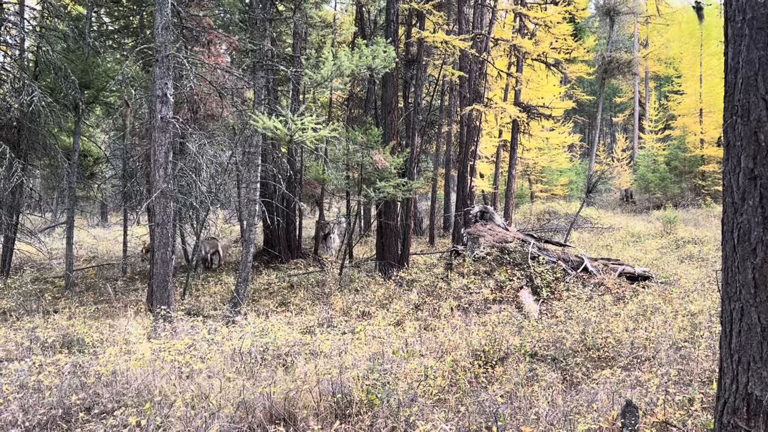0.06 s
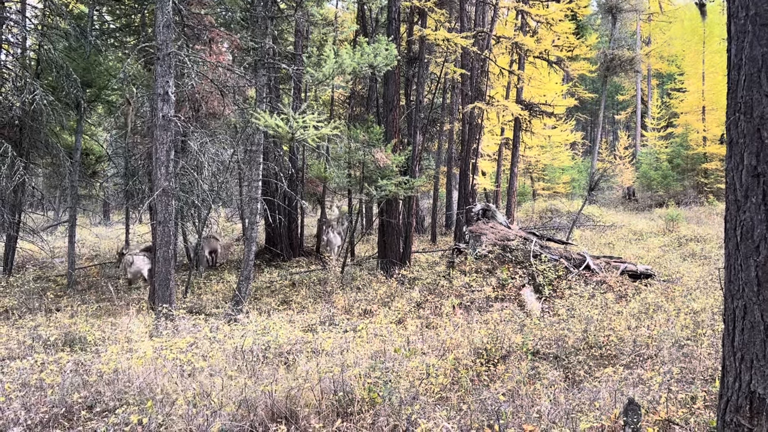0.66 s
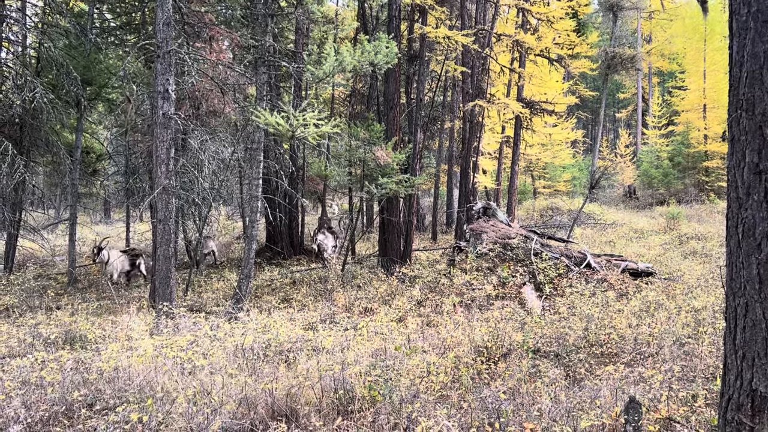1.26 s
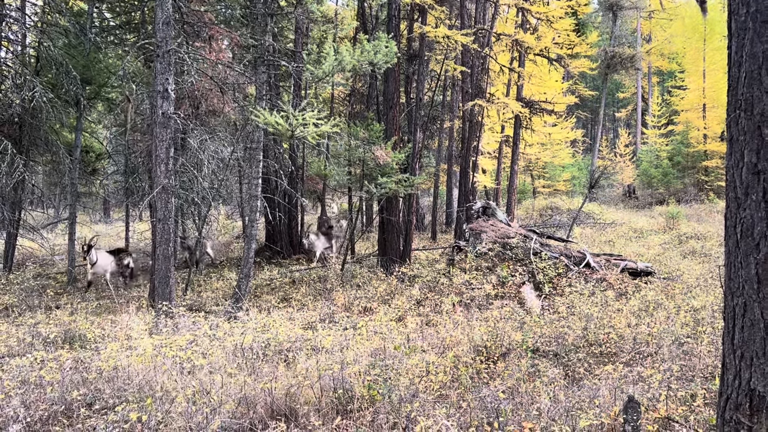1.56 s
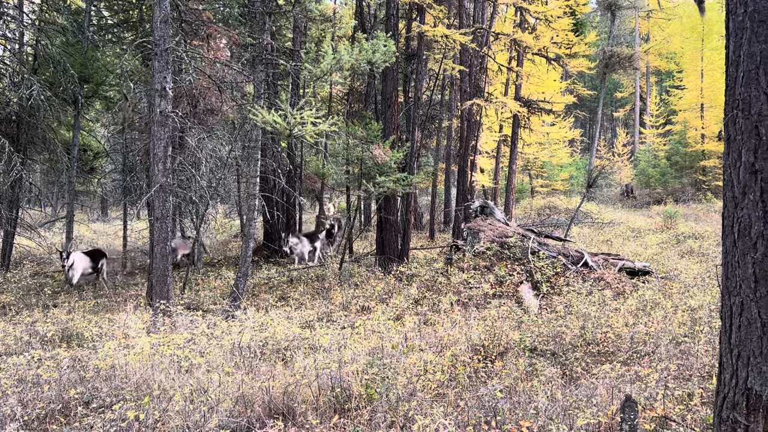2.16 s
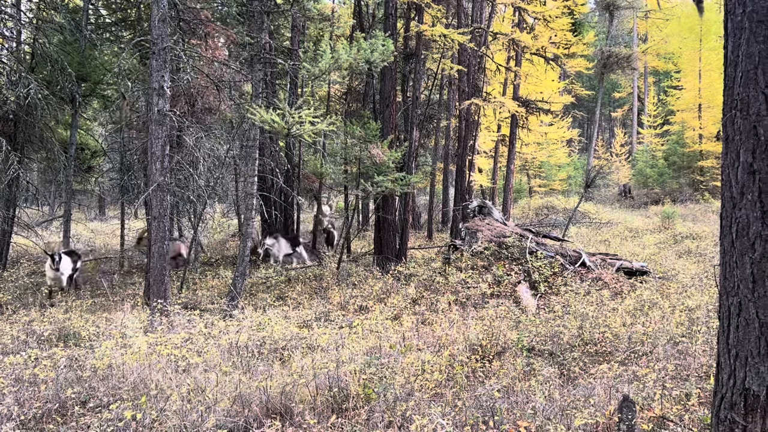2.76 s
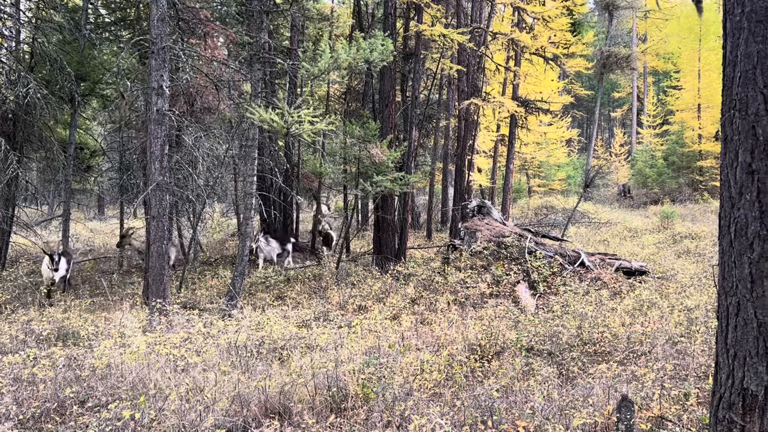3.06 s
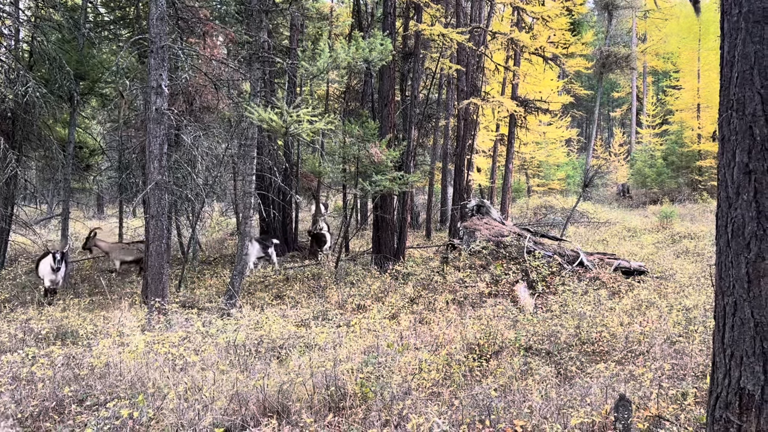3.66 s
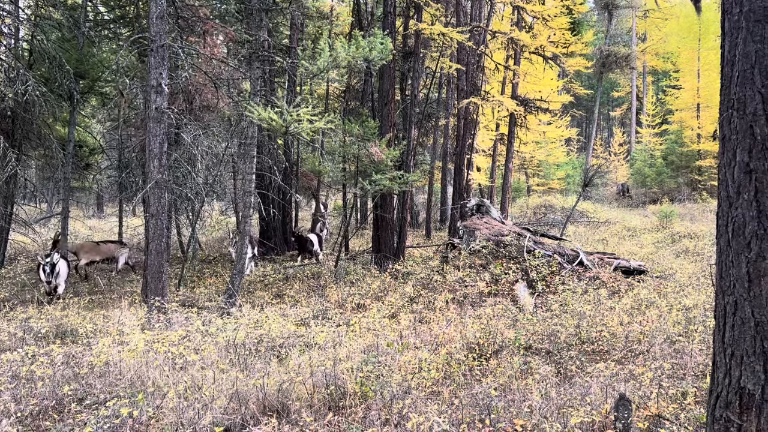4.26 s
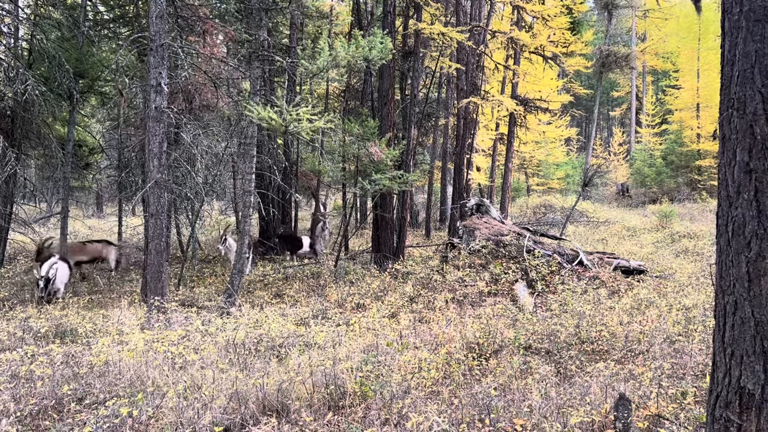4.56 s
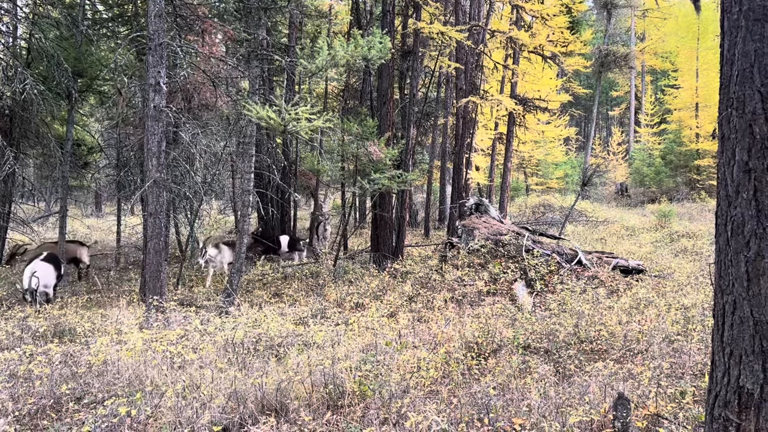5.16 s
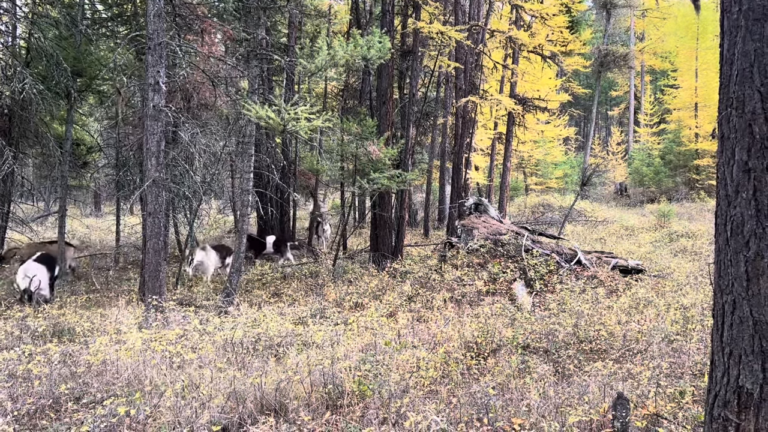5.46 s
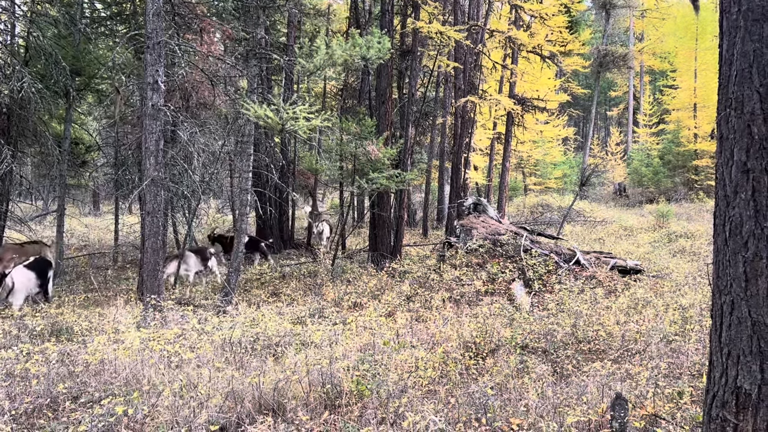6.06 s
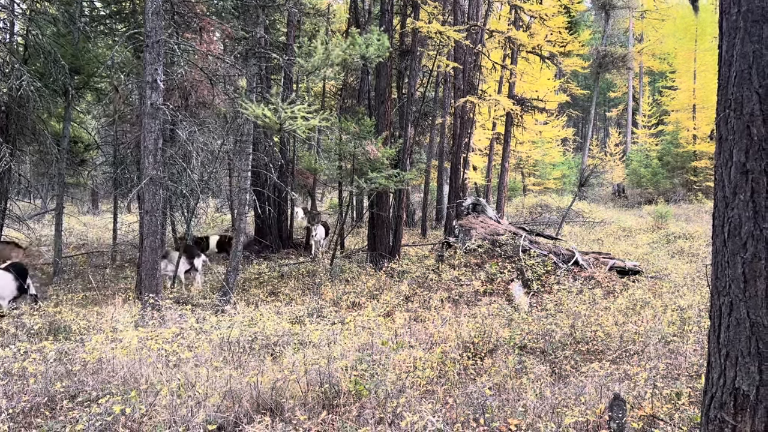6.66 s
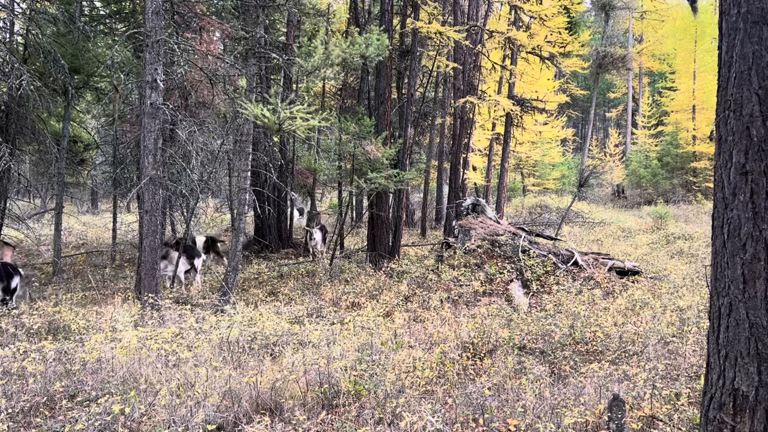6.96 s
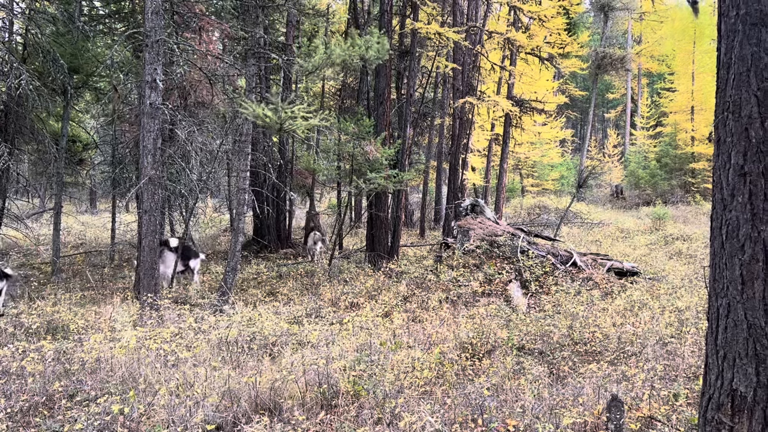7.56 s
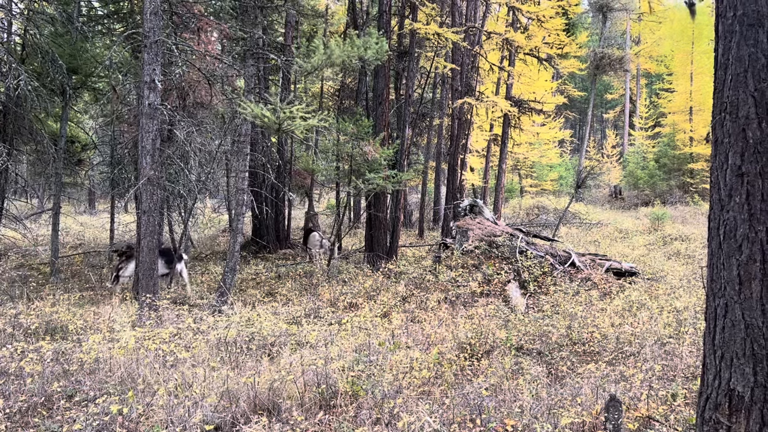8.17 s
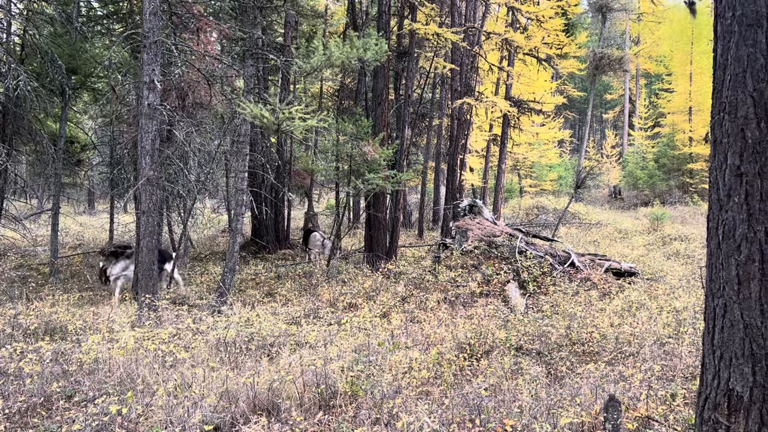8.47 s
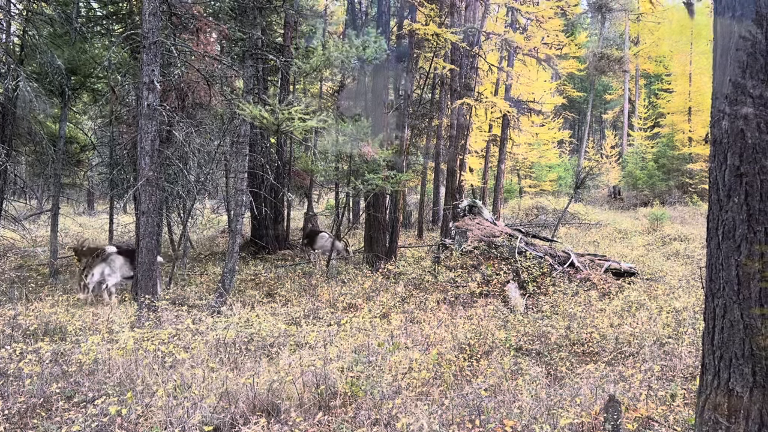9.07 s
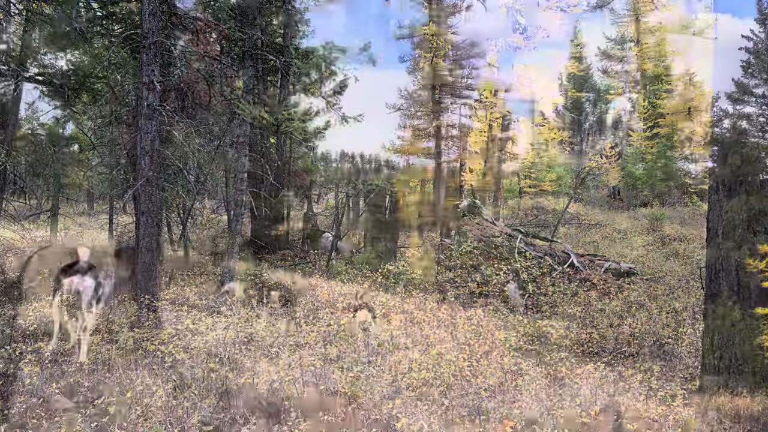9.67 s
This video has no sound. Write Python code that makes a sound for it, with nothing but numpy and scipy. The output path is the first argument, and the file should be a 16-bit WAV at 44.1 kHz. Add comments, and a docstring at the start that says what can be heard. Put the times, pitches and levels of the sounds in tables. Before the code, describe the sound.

Goats swish through dry grass and brush, snapping twigs and crunching litter, with light wind on the microphone.

```python
"""The edge of a forest clearing: goats walk through dry grass and brush, left of a hand-held camera.
Their legs swish through leaves and crackling stems, twigs snap and echo faintly among the trunks,
and hooves crunch the litter and thud on the soil. Light wind rumbles on the microphone and buffets it
in puffs, hardest near the end, when a small bird calls once far off."""
import sys
import numpy as np
from scipy import signal
from scipy.fft import rfft, irfft, next_fast_len
from scipy.io import wavfile
from scipy.ndimage import uniform_filter1d, map_coordinates

SR = 44100
rng = np.random.default_rng(int(sys.argv[2]) if len(sys.argv) > 2 else 0)


def inscribe(sig):
    """Save sig as 16-bit PCM at rate SR to the path in sys.argv[1].

    A 1-D sig is mono; a 2-D sig holds one channel per row.
    Samples are clipped to [-1, 1] before scaling.
    """
    pcm = np.round(np.clip(np.atleast_2d(sig).T, -1, 1) * 32767)
    wavfile.write(sys.argv[1], SR, pcm.astype(np.int16))


N = 432621
TOP_HZ = 15900  # top of the camera's audio band


# Tone of the leaf rustle and of the brighter stem crackle: freq_hz, level_db
LEAF_EQ = [(100, 14.5), (300, 0.5), (600, 0), (1200, -2.5), (2100, 1.5), (3200, 1.5), (4500, -5),
           (5000, -1), (5350, 3.5), (6600, 3), (8000, -2.5), (10000, -36), (16000, -53)]
STEM_EQ = [(2000, -12), (5000, -6), (7300, -7.5), (8400, 1.5), (10300, -9), (12300, -7), (13400, -4),
           (15500, -2)]
def grass():
    """Legs push through leaves and dry stems: a harder push breaks more of them, in clumps."""
    leaf_db, stem_db = brushing()
    fractures_per_s = 3000 * unit(amp(leaf_db))
    leaves = patchy(crackle(fractures_per_s, hiss_share=.52), depth_db=3)
    stems = patchy(crackle(fractures_per_s, hiss_share=.6), depth_db=2)
    leaves = coloured(leaves, LEAF_EQ) * amp(leaf_db + 1.3 * wobble(50))
    stems = coloured(stems, STEM_EQ) * amp(stem_db + 1.43 * wobble(55))
    return leaves + stems


# The bed of the whole herd shuffling: time_s, leaf_db, stem_db
HERD_SHUFFLE = [(0, -63, -57.5), (0.35, -70, -62), (0.82, -80, -68), (1.2, -62.5, -65), (1.55, -63, -56),
                (2.35, -66, -60.5), (3.25, -65.5, -62), (4.75, -65.5, -58.5), (6.1, -69, -55),
                (6.65, -66, -56), (7.8, -66.5, -59.5), (8.55, -61, -54), (9.2, -64, -62),
                (9.81, -61.5, -64.5)]
# Single legs sweeping through the grass: peak_s, leaf_db, stem_over_leaf_db, length_s
LEG_SWISHES = [(0.026, -57.5, 4, 0.033), (0.431, -63, -14, 0.074), (0.733, -61.5, -17, 0.035),
               (0.984, -60.5, -5, 0.14), (1.423, -60.5, 6, 0.21), (1.538, -56.5, -16, .07),
               (1.717, -58, 4, 0.027), (1.801, -57, 1.5, 0.09), (2.202, -63, 8.5, 0.09),
               (2.477, -64, 7, .1), (2.671, -60, -4, 0.17), (2.788, -60, -1, 0.05), (2.966, -57, 5, 0.045),
               (3.079, -63.5, 6, 0.067), (3.343, -55, 1, 0.04), (3.435, -59, 5.5, 0.092),
               (3.702, -62.5, 0.5, 0.16), (4.169, -59.5, 4.5, 0.18), (4.418, -62, 3, 0.07),
               (4.647, -63, 0, .15), (4.866, -57.5, 7, .05), (4.935, -57, 1.5, .07), (5.194, -62, 3.5, .15),
               (5.355, -62, 5, 0.07), (5.558, -59, 3, .11), (5.923, -56.5, -10, 0.12),
               (6.174, -58.5, -10, 0.041), (6.288, -54, 4, 0.065), (6.6, -59, 5, 0.11),
               (6.758, -58.5, 8, .08), (7, -59, 8, 0.046), (7.352, -58.5, -3, .09), (7.529, -59, 6.5, .14),
               (8.08, -64.5, -4, 0.18), (8.577, -54, 3, 0.06), (8.668, -61, 2, .06),
               (8.824, -70.5, 11, 0.45), (9.464, -64, -0.5, 0.38)]
def brushing(drop_db=11, rise_share=.73):
    """Leaf and stem faders in dB: each swish swells over the bed, then falls drop_db per length."""
    t = np.arange(N) / SR
    leaf_power, stem_power = amp(curves(HERD_SHUFFLE)) ** 2
    for peak_s, leaf_db, stem_over_leaf_db, length_s in LEG_SWISHES:
        near = np.abs(t - peak_s) < 4 * length_s
        lengths_away = np.maximum((peak_s - t[near]) / rise_share, t[near] - peak_s) / length_s
        power = amp(leaf_db - drop_db * lengths_away) ** 2
        leaf_power[near] += power
        stem_power[near] += power * amp(stem_over_leaf_db) ** 2
    return 10 * np.log10([leaf_power, stem_power])


def crackle(fractures_per_s, hiss_share, spread_db=2.6, ring_s=.003, size=192):
    """Tiny fractures of unequal size, each with its own pitch, over the hiss of sliding blades."""
    starts = np.flatnonzero(rng.random(N) < fractures_per_s / SR)
    t = np.arange(size) / SR
    chance, pitch, *phases = rng.random((len(starts), 4)).T[..., None]
    envelopes = amp(spread_db * np.minimum(-np.log(chance), 4)) * decay(t, ring_s)
    positions = (starts[:, None] + np.arange(size)).ravel()
    cracks = []
    for phase in phases:
        grains = envelopes * np.sin(2 * np.pi * (TOP_HZ * pitch * t + phase))
        cracks.append(np.bincount(positions, grains.ravel(), N)[:N])
    return np.sqrt(1 - hiss_share) * unit(np.array(cracks)) + np.sqrt(hiss_share) * noise(N)


def patchy(x, depth_db):
    """Each tuft has its own colour: random gain over patches of frequency and time."""
    spectrogram = signal.stft(x, nperseg=256)[2]
    patches = rng.standard_normal(spectrogram.shape[1:])
    for axis, size in [(0, 4), (0, 7), (1, 7), (1, 12)]:
        patches = uniform_filter1d(patches, size, axis)
    return signal.istft(spectrogram * amp(depth_db * unit(patches)), nperseg=256)[1][:, :N]


# Tone of breaking wood: freq_hz, level_db
WOOD_EQ = [(200, -8), (600, 0), (2000, -1), (3300, 1), (4500, -4), (7000, -7), (8500, 6.5), (11000, 1.5),
           (16000, 0)]
# Twig snaps: start_s, level_db, woody_db, brittle_db, ring_hz, pan_left_db
TWIG_SNAPS = [(0.3754, -28.5, -13, -6.5, 6370, -4), (0.9685, -34, -22.5, -52, 5100, 5),
              (1.0605, -28.5, -21, -11, 7100, -1), (1.1331, -38, -16, -26, 2790, 5),
              (1.3857, -31, -48, -21, 6753, 1), (1.4556, -33, -16, -10, 6600, 6),
              (1.628, -34.5, -30, -1, 8360, -2), (2.5446, -33, -12, -14, 4228, 2),
              (2.5849, -37.5, -11, -9, 5620, 2), (3.0864, -39, -7, -11, 5200, 3),
              (3.3057, -19.5, -20, -19, 1901, 1), (3.3362, -37, -3, -19, 2204, 5),
              (3.675, -32.5, -20.5, -27, 4400, 0.5), (4.1378, -30, -40, -18, 6326, 2),
              (4.349, -35.5, -14, -12, 3747, 8), (4.5443, -18.5, -23, 1.5, 2400, 8),
              (4.8349, -32, -5, 1, 3833, 1), (4.861, -33, -22, -13, 5523, 3),
              (4.9532, -31.5, -35, -5, 5220, -2), (5.305, -38, -13, -45, 2940, 5),
              (5.547, -36, -13, -55, 5520, 4), (6.281, -27, -13, 27, 5250, -1),
              (6.2918, -30.5, -14.5, -66, 1930, 3), (6.7423, -32.5, -8, 9, 5373, -2),
              (7.1556, -42, -25, -36, 4590, 5), (7.236, -40, -12, -51, 2824, 3),
              (7.9741, -32.5, -6, -6.5, 3234, 3.5), (8.5118, -32.5, -44, -5, 6460, 1),
              (8.5422, -30.5, -8, 3, 2615, -2), (8.881, -30, -17, -22, 2550, 2.5),
              (8.9528, -39, -7, -17, 2652, 0), (9.4524, -36, -3.5, -6, 6450, -2),
              (9.624, -37, -7, -18, 2907, 3)]
def twigs(strain_s=.004, splinter_s=.05, trim_db=-27, size=8192):
    """Fibres strain, the twig cracks and splinters, small twigs least; each rings at its own pitch."""
    track, t = np.zeros((2, N)), np.arange(size) / SR - strain_s
    strain = .03 * decay(np.abs(t), .0061)
    for start_s, level_db, woody_db, brittle_db, ring_hz, pan_left_db in TWIG_SNAPS:
        fibres = noise(size) * amp(3 * rng.standard_normal(size))
        splinter_gain = .19 * amp(.45 * min(level_db + 28, 0))
        tearing = .8 * decay(np.abs(t), .0035) + splinter_gain * decay(np.abs(t), splinter_s)
        force = fibres * np.where(t < 0, strain, tearing)
        force[:, round(strain_s * SR)] += 2.5  # the crack itself
        thickness_eq = [(2500, woody_db + 10), (6500, .004), (13000, brittle_db + 7)]
        ring_db = lambda hz: 11 * resonance(hz, ring_hz, sharpness=6)
        snap = struck(force, lambda hz: along(WOOD_EQ, hz) + along(thickness_eq, hz) + ring_db(hz))
        centred = np.array([unit(side) for side in microphone(snap)])
        panned = amp(np.array([[.5], [-.5]]) * pan_left_db) * centred
        add(track, start_s - strain_s + .001, amp(level_db + trim_db) * unit(panned))
    return track


# Needles, cones and dry twigs crushed underfoot: start_s, level_db, pitch_hz
LITTER_CRUNCHES = [(0.687, -54.5, 2400), (0.729, -55.5, 922), (0.904, -47.5, 5200), (1.2, -43, 5200),
                   (1.338, -41.5, 4230), (1.44, -40, 7440), (1.527, -44, 3660), (1.56, -49, 950),
                   (1.686, -47, 1140), (1.8, -49, 2500), (1.875, -46.5, 2530), (1.974, -47, 3280),
                   (3.31, -45, 1860), (3.335, -45, 600), (3.446, -42, 6500), (3.569, -45, 2550),
                   (3.811, -48, 1570), (4.203, -48, 2955), (5.204, -46.5, 1200), (5.346, -45.5, 1297),
                   (5.742, -47, 2307), (6.151, -52.5, 700.5), (6.164, -45, 2875), (6.293, -42, 960),
                   (6.461, -52.5, 1080), (6.633, -45, 3026), (7.159, -46, 1099), (7.429, -48, 2698),
                   (8.012, -47, 730), (8.361, -46.5, 713.7), (8.568, -38, 3304), (8.584, -42, 1300),
                   (8.656, -49, 1080), (8.814, -46, 760), (8.858, -46, 795), (8.96, -48, 744),
                   (9.222, -48, 693)]
def crunches(trim_db=-25, size=8192):
    """A hoof presses the litter: a quick cluster of small breaks in one soft resonance."""
    track, t = np.zeros((2, N)), np.arange(size) / SR
    press = (1 - np.exp(-t / .0005)) * decay(t, .038)
    for start_s, level_db, pitch_hz in LITTER_CRUNCHES:
        breaks = press * noise(size) * amp(9 * rng.standard_normal(size))
        crunch = struck(breaks, lambda hz: 30 * np.log10(resonance(hz, pitch_hz, sharpness=2.1) + .001))
        add(track, start_s, amp(level_db + trim_db) * unit(crunch))
    return track


# Single dry stalks that stand out of the rustle: start_s, level_db, pitch_hz
STALK_CRACKS = [(1.528, -35, 9100), (1.569, -40, 8300), (2.12, -36.5, 8400), (2.205, -41, 8430),
                (2.414, -45, 8960), (2.805, -41, 5030), (3.38, -37, 8190), (3.805, -42, 5400),
                (4.914, -43, 3797), (4.931, -34, 13000), (5.912, -38, 8200), (5.959, -37, 13400),
                (6.254, -40, 5300), (6.612, -40, 13480), (6.953, -37, 8576), (7.007, -37, 5400),
                (7.355, -35, 13010), (8.292, -39, 8297), (8.754, -38, 8215)]
def stalks(thin_count=170, decay_s=.013, size=2048):
    """Stalks crack as they give way; thin ones tick at random, more and louder where legs push hard."""
    track, t = np.zeros((2, N)), np.arange(size) / SR
    leaf_db = brushing()[0]
    total_push = np.cumsum(amp(leaf_db))
    moments = np.searchsorted(total_push, rng.random(thin_count) * total_push[-1])
    level_scatter, pitch_scatter = np.clip(rng.standard_normal((thin_count, 2)), -2, 2).T
    thin_db = leaf_db[moments] + 9.5 + 2.3 * level_scatter
    thin_hz = 4400 * 2 ** (.65 * pitch_scatter)
    for start_s, level_db, pitch_hz in [*STALK_CRACKS, *zip(moments / SR, thin_db, thin_hz)]:
        burst = noise(size) * decay(t, decay_s)
        tick = struck(burst, lambda hz: 20 * np.log10(resonance(hz, pitch_hz, sharpness=3) + .001))
        add(track, start_s, amp(level_db) * tick / np.abs(tick).max())
    return track


# Dull tone of the ground: freq_hz, level_db
SOIL_EQ = [(30, -12), (70, -5), (125, 1.5), (175, 1.5), (240, -1.5), (400, -8.5), (600, -6), (1000, -13.5),
           (1600, -23), (4000, -57)]
# Hoof falls: start_s, level_db, knock_db, decay_s
HOOF_THUDS = [(0.025, -46, -41, 0.12), (0.381, -47.5, -31, 0.14), (1.064, -50.5, -9, 0.18),
              (1.559, -50, -25, 0.16), (1.698, -49, -1, 0.12), (3.088, -45, -18, 0.09),
              (3.304, -48, 28, 0.21), (3.771, -51, 16, 0.22), (4.546, -38.5, 16, 0.018),
              (4.838, -48, -13, 0.32), (4.862, -47, -9, .08), (4.954, -46.5, -15, 0.13),
              (5.935, -54, -2, 0.4), (6.293, -50.5, 12, 0.06), (6.541, -48.5, -6, 0.12),
              (6.635, -49.5, -12, 0.25), (7.152, -50.5, -4, 0.18), (7.447, -50, 2, 0.1),
              (8.57, -56, 17, 0.25)]
def hooves(start_hz=500, end_hz=150.6, glide_s=.0035, ring_s=.068, trim_db=2.5, size=16384):
    """A hoof lands: a low thump and a brief shudder, led by a tone that glides quickly down in pitch."""
    track, t = np.zeros((2, N)), np.arange(size) / SR
    pitch_hz = end_hz + (start_hz - end_hz) * np.exp(-t / glide_s)
    thump = .16 * np.sin(2 * np.pi * np.cumsum(pitch_hz) / SR) * decay(t, ring_s)
    for start_s, level_db, knock_db, decay_s in HOOF_THUDS:
        force = noise(size) * decay(t, decay_s)
        force[0] += thump
        hardness_eq = [(200, 0), (700, .5 * (knock_db + 10.5))]  # harder blows are brighter
        thud = struck(force, lambda hz: along(SOIL_EQ, hz) + along(hardness_eq, hz))
        add(track, start_s, amp(level_db + trim_db) * thud / np.abs(thud).max())
    return track


# Boomy tone of a wind hit: freq_hz, level_db
PUFF_EQ = [(25, -1.5), (68, 12.5), (120, 0), (170, 2), (215, -8), (275, -5), (330, -9), (390, -9.5),
           (480, -14.5), (1000, -19)]
# Wind hits on the microphone: start_s, level_db, cutoff_hz, length_s
WIND_PUFFS = [(0.781, -56, 85.5, 0.053), (1.295, -55, 75, 0.045), (1.745, -52, 83, 0.098),
              (2.06, -50.5, 86, 0.024), (2.177, -51, 84.9, 0.038), (2.408, -53, 98, 0.052),
              (2.485, -53, 85.8, 0.038), (2.877, -50, 86, 0.071), (2.975, -52.5, 89, 0.077),
              (3.584, -53, 86.9, 0.055), (3.861, -52.5, 84.8, 0.066), (4.203, -52.5, 78.6, 0.085),
              (4.347, -55.5, 80.6, 0.056), (4.843, -50.5, 134.5, 0.042), (4.956, -49.5, 72.3, 0.076),
              (5.169, -59, 70, 0.071), (5.674, -52, 80, 0.098), (5.755, -44, 178, 0.046),
              (5.814, -46.5, 153, 0.069), (6.799, -53.5, 83.6, .12), (7.079, -46.5, 127, 0.033),
              (7.162, -47, 94, 0.063), (7.309, -39.5, 170, 0.032), (7.554, -44, 90.1, 0.028),
              (7.818, -46.5, 166, 0.04), (7.897, -47, 108.9, 0.056), (8.009, -46, 158.3, 0.092),
              (8.34, -44.5, 141, 0.08), (8.652, -39, 95, 0.053), (8.781, -33.5, 207.5, 0.065),
              (8.856, -36, 224, 0.063), (8.96, -30.5, 248, 0.038), (9.037, -25, 390, 0.055),
              (9.102, -36, 477, 0.024), (9.151, -37, 451.4, 0.045), (9.205, -46.5, 287.6, 0.072),
              (9.301, -39, 444, 0.046), (9.527, -47.5, 176, 0.021)]
def puffs(fade_s=.01924, size=8192):
    """A puff flutters over the ports and stops as abruptly as it came; faster air reaches higher."""
    track, t = np.zeros((2, N)), np.arange(size) / SR
    for start_s, level_db, cutoff_hz, length_s in WIND_PUFFS:
        ramp = np.minimum(t, length_s + fade_s - t) / fade_s
        swell = np.sin(np.pi / 2 * np.clip(ramp, 0, 1)) ** 2
        colour_db = lambda hz: along(PUFF_EQ, hz) - 10 * np.log10(1 + (hz / cutoff_hz) ** 9)
        mid, side = swell * struck(noise(size), colour_db)
        puff = mid + .33 * side * np.array([[1], [-1]])
        gain = amp(level_db) * np.linalg.norm(swell) / np.linalg.norm(mid)
        add(track, start_s - fade_s / 2, gain * puff)
    return track


# Low end of the breeze: freq_hz, level_db
RUMBLE_EQ = [(15, -81), (30, -4), (48, 12.5), (70, -3), (88, -3), (120, -18.5), (170, -22), (280, -27),
             (500, -44.5), (1500, -110)]
# The breeze rising and falling on the microphone: time_s, level_db
BREEZE_FADER = [(0, -81), (0.35, -74.5), (0.75, -57), (1.15, -74), (1.7, -62.5), (2.45, -59.5), (2.73, -70),
                (2.95, -57), (3.6, -57), (4.05, -69), (4.25, -57.5), (4.6, -71), (5.15, -61.5), (5.5, -62),
                (5.8, -58), (6.04, -73), (7.0, -62), (8.05, -49), (8.5, -61.5), (8.75, -42.5), (9.2, -41.5),
                (9.81, -60.5)]
def wind(eddy_db=3.5, eddies_per_s=15):
    """Slow eddies shake the camera, nearly alike at both ports, swelling and sinking at random."""
    mid, side = coloured(noise(N), RUMBLE_EQ)
    local_power = np.abs(uniform_filter1d(mid ** 2, size=2400))
    mid = unit(mid / np.sqrt(local_power + .016))  # even strength within a gust
    strength_db = curves(BREEZE_FADER)[0] + eddy_db * wobble(eddies_per_s)
    return amp(strength_db) * (mid + .39 * side * np.array([[1], [-1]]))


def bird(start_s=9.444, length_s=.105, start_hz=6600, level_db=-55.5):
    """One thin, quavering note of a small bird far off in the trees: it starts quickly and fades."""
    progress = np.clip((np.arange(N) / SR - start_s) / length_s, 0, 1)
    pitch_hz = start_hz - 170 * progress + 400 * wobble(1100)
    envelope = np.interp(progress, [0, .07, .8, 1], [0, 1, .55, 0])
    note = envelope * np.sin(2 * np.pi * np.cumsum(pitch_hz) / SR)
    return amp(level_db) * np.array([note, np.zeros(N)])  # all direct, nothing scattered


# Tone of the outdoor ambience: freq_hz, level_db
AIR_EQ = [(40, -8), (100, -4), (260, -11.5), (1000, -15.5), (3000, -15), (8500, -9), (12000, -23.5),
          (16000, -18)]
def air(level_db=-67):
    """A faint, steady hiss of open air."""
    return amp(level_db) * coloured(noise(N), AIR_EQ)


# Reverb time among the trees: freq_hz, t60_s
FOREST_DECAY = [(200, 0.6), (2000, 0.29), (6000, 0.096), (14000, 0.032)]
def forest(x):
    """Trunks scatter a thin tail; the treble dies first."""
    hz, t, spectrogram = signal.stft(noise(SR // 2), SR, nperseg=256)
    fading = spectrogram * decay(t, along(FOREST_DECAY, hz)[:, None])
    tail = signal.istft(fading, SR, nperseg=256)[1]
    return signal.fftconvolve(x, tail / np.linalg.norm(tail[0]), axes=1)[:, :N]


# Phase between the two microphone ports: freq_hz, left_lead_rad
PORT_PHASE = [(50, 0), (400, .6), (900, 2), (1500, 3.1), (2100, 3.6), (3000, 5.5), (4300, 7.1), (5300, 8.8),
              (6100, 9.4), (6600, 6.2), (8500, 4.9), (9300, 3.7), (10400, 3.1), (11300, 2.4), (12000, .9),
              (13500, 0), (15500, -1.4)]
# Their balance: freq_hz, pan_left_db
PORT_BALANCE = [(200, 0.5), (700, 2.5), (1400, 4), (1950, 7.5), (2400, 4.5), (2900, 3.5), (4300, -0.5),
                (5300, 9), (6300, 1.5), (7300, -1.5), (9000, 2.5), (16000, 1)]
# How alike they sound, from 0 (wide) to 1 (the same): freq_hz, likeness
PORT_LIKENESS = [(100, 0.93), (600, 0.61), (1600, 0.27), (3000, 0.19), (6300, 0.25), (8200, 0.65),
                 (10000, 1), (11800, 0.89), (13400, 0.75), (15500, 0.43)]
def microphone(pair):
    """A direct and a scattered signal, as the two ports on the camera body receive them."""
    width = lambda hz: np.arccos(np.clip(along(PORT_LIKENESS, hz), 0, 1)) / 2
    direct, scattered = filtered(pair, lambda hz: np.array([np.cos(width(hz)), np.sin(width(hz))]))
    sides = np.array([[.5], [-.5]])
    body = lambda hz: amp(sides * along(PORT_BALANCE, hz)) * np.exp(1j * sides * along(PORT_PHASE, hz))
    return filtered(np.array([direct + scattered, direct - scattered]), body)


def amp(db):
    """Decibels to gain."""
    return 10 ** (np.asarray(db) / 20)


def decay(t, t60_s):
    """An envelope that falls 60 dB in t60_s."""
    return amp(-60 * t / t60_s)


def noise(size):
    """Two independent channels of white noise."""
    return rng.standard_normal((2, size))


def unit(x):
    """Scale to rms 1."""
    return x / np.sqrt(np.mean(x ** 2) + 1e-20)


def along(points, hz):
    """Read (freq_hz, value) points on a log axis."""
    freqs, values = np.transpose(points)
    return np.interp(np.log(hz + 1), np.log(freqs + 1), values)


def curves(rows):
    """Fader curves: one value per sample for each column after the time."""
    time_s, *columns = np.transpose(rows)
    return [np.interp(np.arange(N) / SR, time_s, column) for column in columns]


def wobble(knots_per_s):
    """A smooth random curve."""
    knots = rng.standard_normal(int(N * knots_per_s / SR) + 4)
    return map_coordinates(knots, [np.arange(N) * knots_per_s / SR])


def resonance(hz, centre_hz, sharpness):
    """Gain of one broad resonance, 1 at its centre."""
    return 1 / np.sqrt(1 + (sharpness * (hz / centre_hz - centre_hz / (hz + 1))) ** 2)


def filtered(x, response):
    """x through a complex frequency response."""
    length = x.shape[-1]
    size = next_fast_len(length + 8192)
    return irfft(rfft(x, size) * response(np.fft.rfftfreq(size, 1 / SR)), size)[..., :length]


def coloured(x, eq):
    """x through an EQ curve, at rms 1."""
    return unit(filtered(x, lambda hz: amp(along(eq, hz))))


def struck(force, gain_db):
    """A short force through a body whose gain is a function of frequency."""
    size = force.shape[-1]
    cepstrum = irfft(np.log(amp(gain_db(np.fft.rfftfreq(size, 1 / SR)))), size)
    cepstrum[1:size // 2] *= 2  # minimum phase: the body rings only after the hit
    cepstrum[size // 2 + 1:] = 0
    return irfft(rfft(force) * np.exp(rfft(cepstrum)), size)


def add(track, start_s, sound):
    """Mix a sound into a track."""
    part = track[..., max(round(start_s * SR), 0):][..., :sound.shape[-1]]
    part += sound[..., :part.shape[-1]]


def scene():
    """The mix: herd, bird and air, with the wind right on the microphone."""
    snaps, steps, note = twigs(), crunches() + stalks(), bird()
    birdcall = note + forest(note)
    echo = forest(amp(-17) * snaps + amp(-11.5) * steps)
    clearing = grass() + steps + hooves() + birdcall + echo + air()
    return microphone(clearing) + snaps + puffs() + wind()


def record(dry):
    """The camera cuts the deepest rumble and keeps nothing above its band limit."""
    low_cut_hz = 42
    return filtered(dry, lambda hz: (hz < TOP_HZ) / np.sqrt(1 + (low_cut_hz / (hz + 1)) ** 6))


dry = scene()
out = record(dry)
inscribe(out)
```